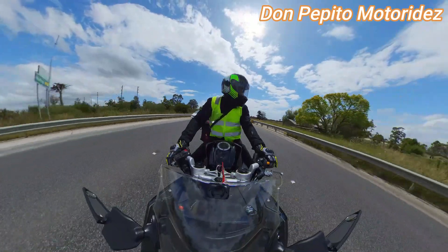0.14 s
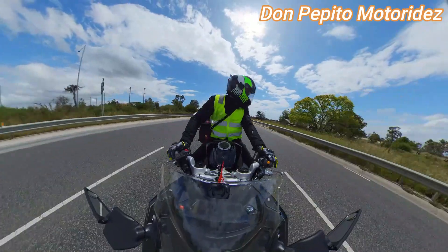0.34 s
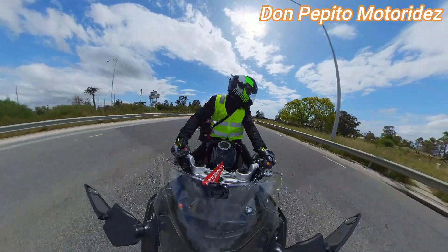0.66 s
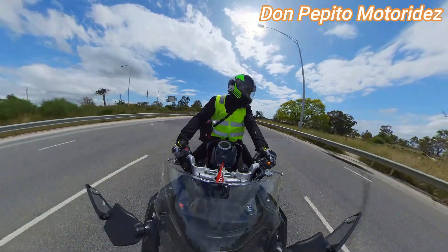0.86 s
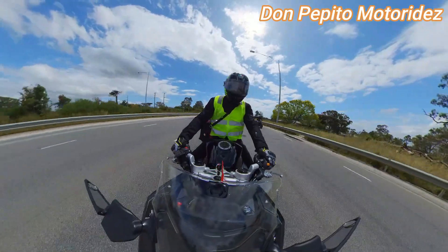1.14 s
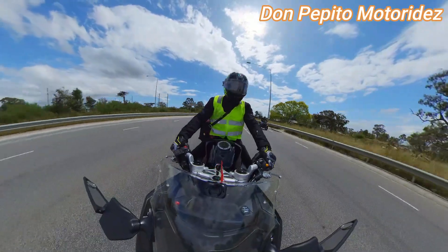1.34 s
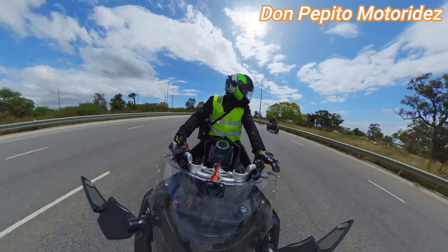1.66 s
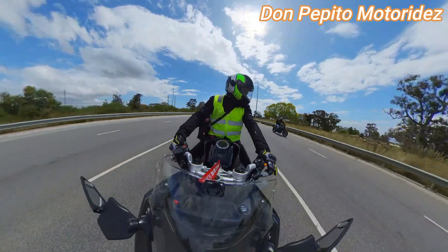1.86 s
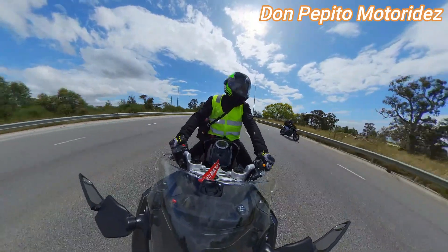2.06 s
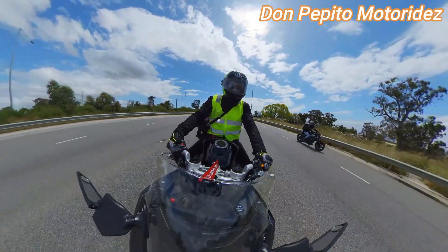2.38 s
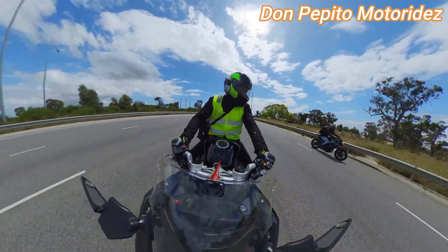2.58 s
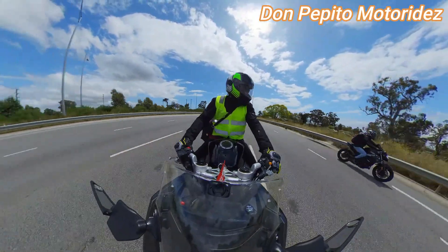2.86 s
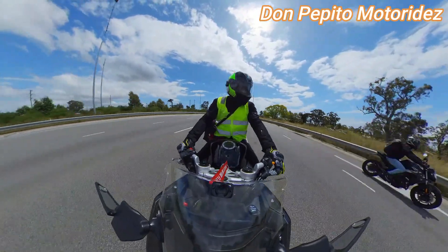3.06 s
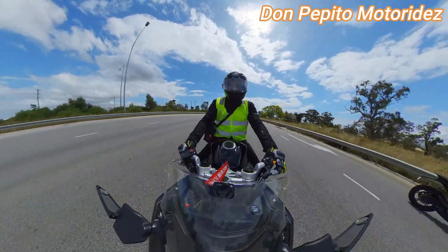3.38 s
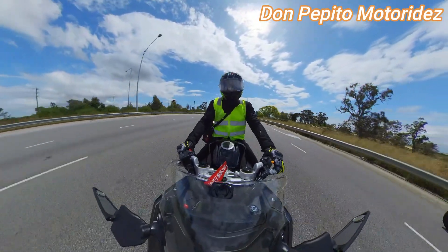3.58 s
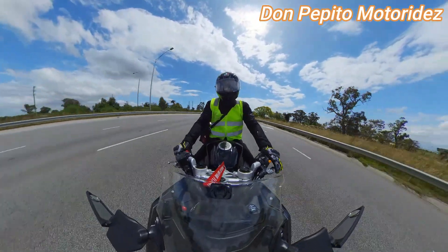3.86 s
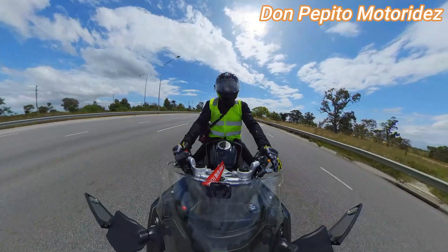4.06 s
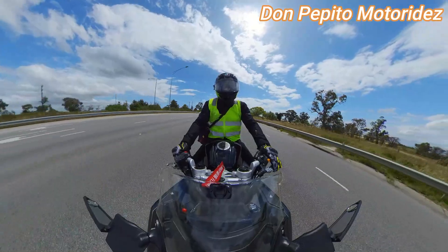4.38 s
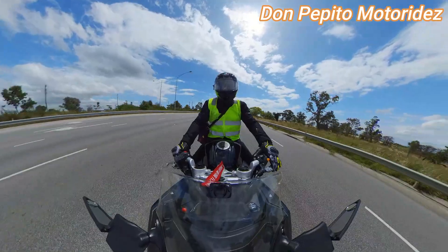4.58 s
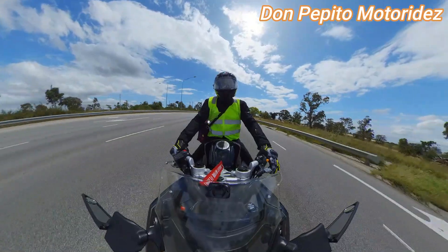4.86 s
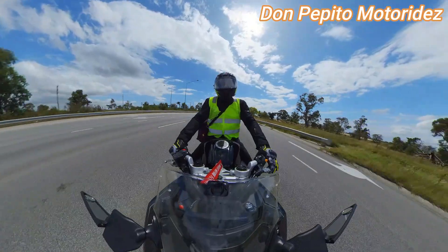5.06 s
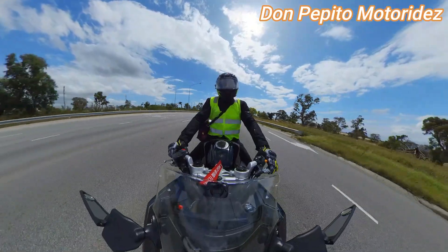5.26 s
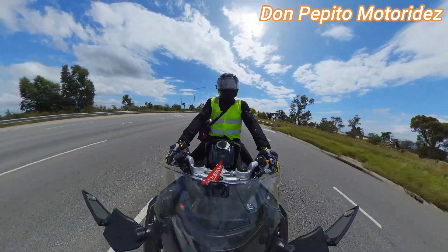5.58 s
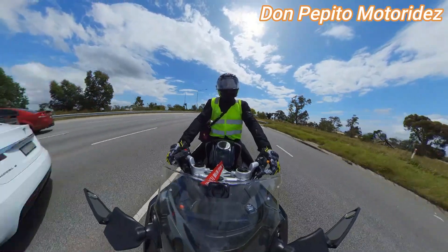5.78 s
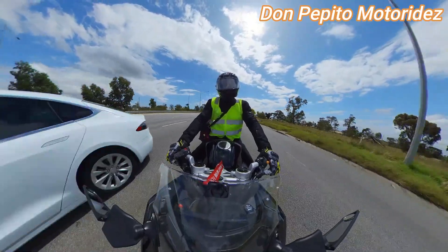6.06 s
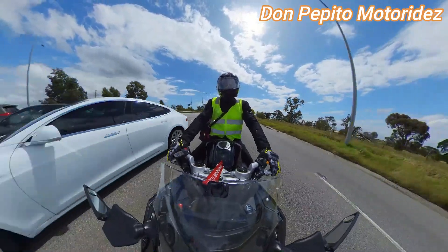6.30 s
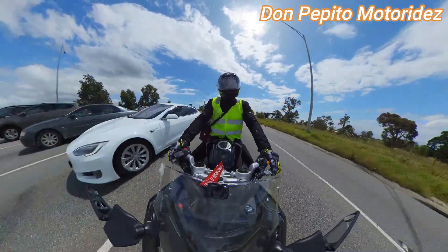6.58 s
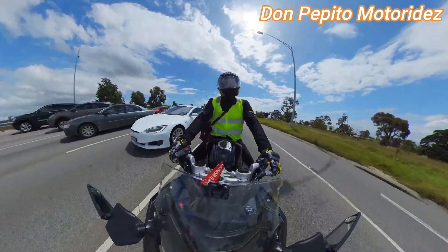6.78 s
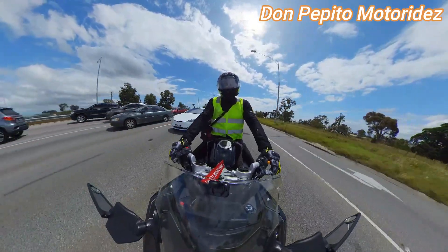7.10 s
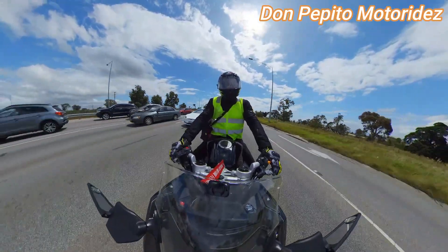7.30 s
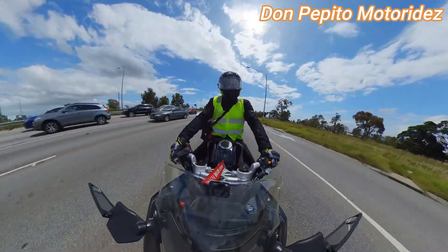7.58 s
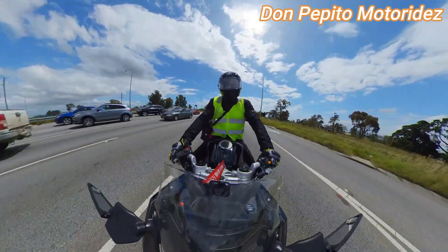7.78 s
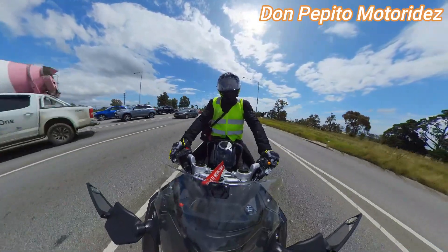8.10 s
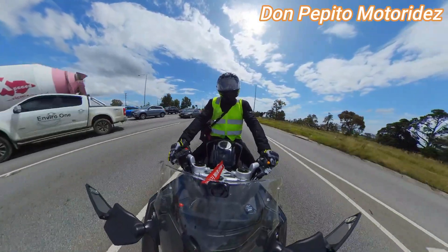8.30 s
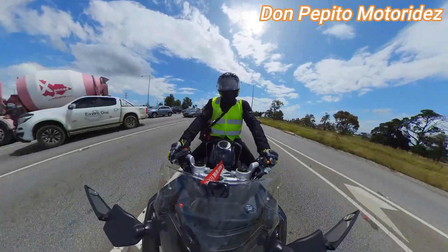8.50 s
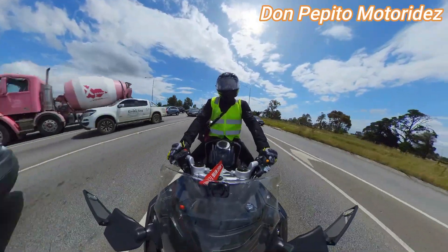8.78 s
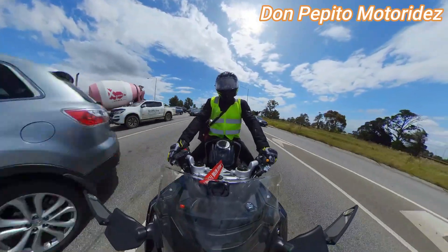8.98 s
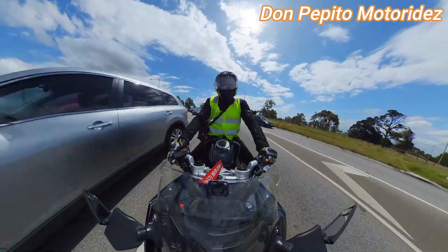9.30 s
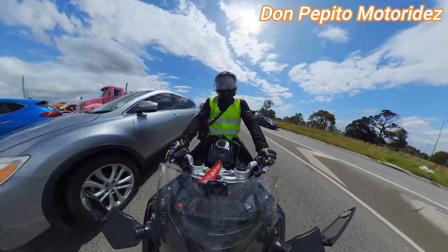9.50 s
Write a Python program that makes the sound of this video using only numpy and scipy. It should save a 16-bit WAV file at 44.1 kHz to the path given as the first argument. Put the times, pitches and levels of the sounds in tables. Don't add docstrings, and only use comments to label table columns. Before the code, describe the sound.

Microphone on the fairing of a twin-cylinder motorcycle on an open road. The engine drone sinks while coasting, two quick blips mark downshifts with clunks, then a full, barking pull rises for about two seconds. The throttle shuts, gear whine descends, and the bike creeps at a low, uneven idle. Wind buffeting, road hiss and valve rattle continue throughout.

```python
import sys
import numpy as np
from scipy import signal
from scipy.fft import rfft, irfft, next_fast_len
from scipy.io import wavfile
from scipy.ndimage import uniform_filter1d, minimum_filter1d

SR = 44100
rng = np.random.default_rng(int(sys.argv[2]) if len(sys.argv) > 2 else 0)


def boost(x):
    u = np.asarray(x, float) / 20
    return 10 ** u


def dump_mix(stems):
    frames = np.atleast_2d(stems).T
    limited = np.clip(frames, -1, 1)
    pcm = np.round(limited * 32767).astype(np.int16)
    wavfile.write(sys.argv[1], SR, pcm)


N = 425124
T_S = np.arange(N) / SR

# (t/s, f/Hz)
CRANK_HZ = [(0, 74.9), (.25, 73.5), (2.15, 57.2), (2.27, 48.3), (2.68, 51.6), (2.97, 60.5), (3.05, 63.7),
            (3.52, 64.3), (4.8, 69.4), (5.0, 69.0), (5.12, 66.8), (5.25, 68.2), (5.75, 66.1), (6.3, 60.9),
            (7.3, 53.8), (7.78, 47.9), (8.0, 40.0), (9.64, 38.0)]
# (t/s, throttle/0-1, bark/0-1)
THROTTLE = [
    (3.0, 0, .3),
    (3.1, .1, .15),
    (3.24, .75, .15),
    (3.55, 1, .15),
    (3.9, 1.05, .45),
    (4.1, 1.05, .9),
    (4.6, .95, .85),
    (4.95, .83, .4),
    (5.09, 0, .3),
]
# (t/s of top revs, gain/Hz, throttle/0-1)
BLIPS = [
    (2.4, 11, .45),
    (2.84, 22, .6),
    (3.42, 2.6, 0),
]
# (t/s, shut exhaust level/dB, frame drone level/dB)
OVERRUN_DB = [(0, -16.5, -14.5), (.4, -17, -20.5), (.9, -22.5, -18), (1.4, -22, -17.5), (1.8, -21, -13),
              (2.17, -21, -13.5), (3.2, -25.5, -14), (3.6, -30.5, -17), (4.95, -29, -20.5),
              (5.12, -20.5, -14.5), (6.15, -21, -12), (6.45, -17, -12), (7.35, -16, -14),
              (7.9, -17.5, -14.5), (8.0, -14.5, -19), (8.62, -14.5, -22), (9.05, -15.5, -17),
              (9.64, -18.5, -15.5)]
# (t/s, ramp/s, drone loss/dB, exhaust loss/dB)
CLUTCH = [
    (2.33, 0.11, 15, 1),
    (2.7, 0.16, 11.5, -1.3),
    (5.02, 0.032, 6, 2),
    (8.776, 0.098, 1, 11.5),
    (9.5, .06, 14, 3.5),
]
# (f/Hz, level/dB)
OPEN_PIPE_DB = [(15, -50), (66, -4), (133, -8), (200, 0), (257, -5), (275, -12), (328, -5), (346, -11),
                (400, -5), (470, -4), (535, -22), (610, -11), (1010, -21), (2200, -110)]
# (f/Hz, level/dB)
SHUT_PIPE_DB = [(15, -50), (45, -12), (110, -6), (155, 1), (230, -1), (265, -9), (305, -7), (350, -16),
                (415, -10), (490, -22), (700, -28), (1300, -48), (2500, -100)]
# (from t/s, to t/s, level/dB)
MESH = [
    (-.1, .9, -50),
    (.9, 1.6, -47.5),
    (1.6, 2.16, -50),
    (3.05, 3.35, -46),
    (3.53, 4.33, -44),
    (4.33, 5.0, -49),
    (5.19, 5.88, -43),
    (5.88, 6.6, -44.5),
    (6.6, 7.76, -42),
]
# (f/crank, level/dB)
MESH_LINES = [
    (20, -7),
    (22, 3.5),
    (24, 1),
    (26, -12),
]
# (f/Hz, level/dB)
GEAR_CASE_DB = [(1050, -12), (1180, 0), (1235, -7), (1285, 0), (1350, -7), (1450, 0), (1600, -1),
                (1650, -3), (1720, -11), (1800, -3), (1900, -14)]
# (peak t/s, length/s, f/Hz, Q, level/dB)
KNOCKS = [(.58, .01, 120, 1., -16), (1.19, .012, 170, 1., -10), (2.335, .045, 310, 2.5, -13),
          (2.385, .01, 600, 1., -26), (2.745, .045, 330, 3., -10), (2.93, .015, 1420, 6., -35),
          (3.02, .02, 1330, 8., -35), (3.475, .015, 1450, 6., -33), (3.46, .04, 250, 1.2, -20),
          (4.36, .03, 480, 1.3, -18), (5.13, .018, 1480, 10., -29), (8.6, .015, 2400, .6, -41),
          (9.222, .012, 2500, 4., -39), (9.3, .016, 2300, .4, -31)]
# (f/Hz, level/dB)
KNOCK_PATH_DB = [(100, 3.0), (2500, -3.0), (3600, -10.0), (4700, -39.0), (5600, -21.5), (7300, -4),
                 (8400, -19.0), (9500, -62.5)]
# (t/s, level over calm/dB)
GUSTS = [(.02, 4.5), (.24, 5.5), (.57, 9.5), (1.1, 7.5), (1.5, 5), (1.83, 6), (2.06, 2.5), (2.28, 10),
         (2.68, 5), (3.3, 4.5), (3.55, 3), (3.78, 0.5), (4.62, 1), (5.13, 7), (5.58, 5.5), (5.9, 5.5),
         (6.75, 1), (7.6, 4.5), (7.95, 4), (8.32, 4.5), (8.85, 4), (9.37, 8.5), (9.61, 5.5)]
# (t/s, rattle level/dB)
SHAKE_DB = [(0.06, -61.5), (0.72, -68), (2.97, -59), (3.18, -53), (3.55, -57), (5.08, -53), (5.77, -59.5),
            (6.22, -53.5), (7.25, -58.5), (7.3, -54.5), (7.96, -56.5), (8.36, -62.5), (8.6, -53.5),
            (8.65, -64.5), (9.26, -61.5), (9.31, -52), (9.34, -61.5), (9.55, -60)]
# (f/Hz, level/dB per Hz)
BUFFET_DB = [(11, -63), (18, -23), (54, 0), (97, -3), (133, -5.5), (150, -6.5), (167, -10.5), (201, -8.5),
             (420, -44), (550, -71.5), (920, -120)]
# (f/Hz, level/dB per Hz)
RUSH_DB = [(150, -15.5), (260, -1), (308, -7.5), (392, -2), (570, -10.5), (645, -8.5), (726, -7.5),
           (1090, -19.5), (1500, -28), (1950, -57), (3300, -120)]
# (f/Hz, level/dB per Hz)
HISS_DB = [(760, -25), (1300, -3), (1500, -5), (1720, -5.5), (2640, -16), (3350, -23), (4500, -42),
           (5200, -42), (6760, -80.5), (11400, -120)]
# (f/Hz, level/dB per Hz)
RATTLE_DB = [(2880, -47.5), (4900, -30.5), (5380, -19.5), (5880, -6), (6330, -3), (7100, 1), (7950, -1),
             (8360, -7.5), (8820, -17), (11500, -54.5), (19400, -120)]
# (t/s, level at 4-5 kHz/dB)
JOLTS = [(0.2932, -57), (0.5796, -49), (0.7831, -60), (1.1932, -54), (1.2331, -55), (1.4032, -58),
         (1.7534, -55), (2.1909, -56), (2.3745, -58), (2.4334, -58), (2.7067, -54), (2.8335, -57),
         (3.9275, -55), (4.9636, -54), (5.0519, -52), (6.7226, -56), (7.0135, -56), (7.649, -55),
         (8.0521, -56), (8.6318, -47), (9.3482, -55)]
# (f/Hz, level/dB)
CRACK_DB = [(100, -5), (1500, 8.5), (4500, 3), (9000, -17), (15500, -27), (16500, -70)]


def level(x, db):
    return x * boost(db) / np.sqrt(np.mean(x ** 2))


def columns(table):
    t_s, *values = np.transpose(table)
    return [np.interp(T_S, t_s, value) for value in values]


def hump(at_s, rise_s, fall_s):
    return np.interp(T_S, [at_s - rise_s, at_s, at_s + fall_s], [0, 1, 0])


def walk(rate_hz):
    hold = int(SR / rate_hz)
    steps = np.repeat(rng.standard_normal(N // hold + 1), hold)
    return 1.11 * uniform_filter1d(uniform_filter1d(steps, hold), hold)[:N]


def colour(x, outline):
    size = next_fast_len(N + SR, real=True) // 2 * 2
    hz, db = np.transpose(outline)
    bin_hz = np.arange(size // 2 + 1) * SR / size
    log_gain = np.interp(np.log(bin_hz + 1), np.log(hz), db) * np.log(10) / 20
    cepstrum = irfft(log_gain, size)
    cepstrum[1:size // 2] *= 2
    cepstrum[size // 2 + 1:] = 0
    return irfft(rfft(x, size) * np.exp(rfft(cepstrum)), size)[:N]


def band_rms(x, lo_hz, hi_hz):
    sos = signal.butter(4, [lo_hz, hi_hz], "band", fs=SR, output="sos")
    return np.std(signal.sosfilt(sos, x))


def rider():
    (crank_hz,), (pull, bark) = columns(CRANK_HZ), columns(THROTTLE)
    rise_s, fall_s, lead_s = .14, .13, .05
    for at_s, rev_hz, opening in BLIPS:
        crank_hz = crank_hz + rev_hz * hump(at_s, rise_s, fall_s)
        pull = pull + opening * hump(at_s - lead_s, rise_s, fall_s - lead_s)
    idle = np.clip((T_S - 8.0) * 10, 0, 1)
    hunt_per_s, hunt_hz, hunt_top_s = 2.55, 2.6, 8.65
    hunt = np.cos(2 * np.pi * hunt_per_s * (T_S - hunt_top_s))
    return crank_hz + idle * hunt_hz * hunt, pull, bark, idle


def firings(turns, pull, idle):
    free_db, loaded_db, idle_db = 1.1, .4, 1.2
    scatter_db = free_db + (loaded_db - free_db) * pull + (idle_db - free_db) * idle
    at = np.flatnonzero(np.diff(np.floor(turns))) + 1
    period = np.gradient(at)
    chance = rng.standard_normal((N // 400, 2))[:len(at)]
    late = .008 * scatter_db[at] * chance[:, 0] * period
    pulses = np.zeros(N)
    size = boost(scatter_db[at] * chance[:, 1]) * np.sqrt(period)
    pulses[np.clip(at + late, 0, N - 1).astype(int)] = size
    return pulses


def silencer(x, turn_rad, lag_s_per_hz):
    hz = np.arange(N // 2 + 1) * SR / N
    phase_rad = turn_rad + np.pi * lag_s_per_hz * hz ** 2
    return irfft(rfft(x) * np.exp(-1j * phase_rad), N)


def exhaust(pulses, pull, bark, shut_db):
    loaded = level(colour(silencer(pulses, -np.pi / 2, 7e-6), OPEN_PIPE_DB), -12.3)
    shut = level(colour(silencer(pulses, -2.0, 6e-6), SHUT_PIPE_DB), 0)
    upper = signal.sosfiltfilt(signal.butter(4, 560, "high", fs=SR, output="sos"), loaded)
    return pull * (loaded + (bark - 1) * upper) + boost(shut_db) * shut


def frame_drone(turns, idle, drone_db):
    phase_rad = 4 * np.pi * (turns + .2 + idle / 4)
    return np.sqrt(2) * boost(drone_db + .5 * walk(25)) * np.sin(phase_rad)


def engine(turns, pull, bark, idle, pulses):
    shut_db, drone_db = columns(OVERRUN_DB)
    for at_s, ramp_s, drone_loss_db, shut_loss_db in CLUTCH:
        free = hump(at_s, ramp_s, ramp_s)
        shut_db = shut_db - shut_loss_db * free
        drone_db = drone_db - drone_loss_db * free
    return exhaust(pulses, pull, bark, shut_db) + frame_drone(turns, idle, drone_db)


def primary_gear(crank_hz, turns):
    mesh, edge_s = 0, .03
    for from_s, to_s, db in MESH:
        corners_s = [from_s - edge_s, from_s + edge_s, to_s - edge_s, to_s + edge_s]
        mesh = mesh + boost(db) * np.interp(T_S, corners_s, [0, 1, 1, 0])
    out = 0
    for order, db in MESH_LINES:
        order = round(order)
        wobble_rad = 1.7 * walk(45)
        case_db = np.interp(order * crank_hz, *np.transpose(GEAR_CASE_DB))
        line = np.sin(2 * np.pi * order * turns + wobble_rad)
        out = out + mesh * boost(db + case_db + 3.1 * walk(11)) * line
    return np.sqrt(2) * out


def knocks(pulses):
    out = 0
    noise = rng.standard_normal(N)
    for at_s, length_s, hz, q, db in KNOCKS:
        b, a = signal.iirpeak(hz, q, fs=SR)
        shape = np.exp(-((T_S - at_s) / length_s) ** 2)
        drive = noise + (hz < 1000) * level(pulses, 0)
        burst = signal.lfilter(b, a, signal.lfilter(b, a, drive)) * shape
        out = out + boost(db) * burst * np.sqrt(np.sum(shape ** 2) / np.sum(burst ** 2))
    return colour(out, KNOCK_PATH_DB)


def noise_layer(outline, lo_hz, hi_hz, db):
    noise = colour(rng.standard_normal(N), outline)
    return noise / band_rms(noise, lo_hz, hi_hz) * boost(db)


def wind_buffet(gust):
    db = -22.5 + sum(gust_db * hump(at_s, .1, .1) for at_s, gust_db in GUSTS)
    return noise_layer(BUFFET_DB, 22, 56, db + .8 * gust + 1.2 * walk(30))


def air_rush(shake_db, pull, gust, stroke):
    db = -27.5 + .35 * (shake_db + 54.5) - .5 * pull
    return noise_layer(RUSH_DB, 560, 950, db + .8 * gust + .8 * walk(30) + 1.2 * stroke)


def road_hiss(shake_db, gust, stroke):
    db = -47 + .45 * (shake_db + 55) + 3 * hump(3.27, .6, .35)
    return noise_layer(HISS_DB, 1900, 3600, db + .9 * gust + .8 * walk(30) + 1.2 * stroke)


def valve_rattle(shake_db, gust, stroke):
    db = shake_db - .5
    return noise_layer(RATTLE_DB, 5800, 8700, db + .9 * gust + 1.5 * walk(30) + 2.2 * stroke)


def air(turns, pull):
    shake_db, = columns(SHAKE_DB)
    gust, stroke = .5 * walk(12), np.cos(2 * np.pi * turns)
    out = wind_buffet(gust) + air_rush(shake_db, pull, gust, stroke)
    return out + road_hiss(shake_db, gust, stroke) + valve_rattle(shake_db, gust, stroke)


def overload_cracks():
    spikes = np.zeros(N)
    for at_s, db in JOLTS:
        spikes[int(at_s * SR)] = boost(1.4 * (db + 55) - 32)
    return colour(spikes, CRACK_DB)


def scene():
    crank_hz, pull, bark, idle = rider()
    turns = np.cumsum(crank_hz) / SR
    pulses = firings(turns, pull, idle)
    out = engine(turns, pull, bark, idle, pulses) + primary_gear(crank_hz, turns)
    return (out + knocks(pulses) + air(turns, pull))[None]


def band_limit(x):
    return signal.sosfilt(signal.butter(12, 15762, fs=SR, output="sos"), x)


def record(dry):
    ceiling, top_hz, noise_db = .98, 8970, -91
    need = np.minimum(1, ceiling / np.maximum(np.abs(dry), 1e-9))
    gain = minimum_filter1d(need, size=600)
    gain = uniform_filter1d(uniform_filter1d(gain, size=300), size=300)
    top_cut = signal.ellip(8, .1, 30, top_hz, fs=SR, output="sos")
    held = signal.sosfiltfilt(top_cut, gain * dry)
    mix = held + overload_cracks() + boost(noise_db) * rng.standard_normal(N)
    return band_limit(mix)


dry = scene()
out = record(dry)
dump_mix(out)
```